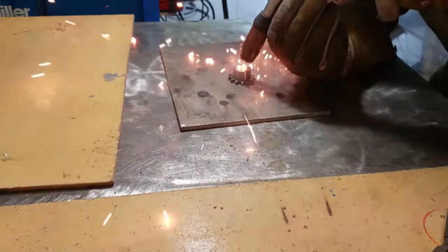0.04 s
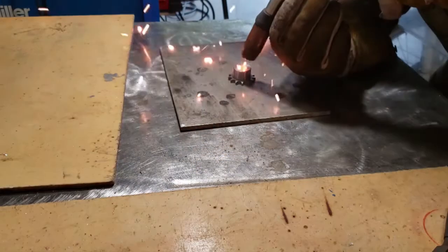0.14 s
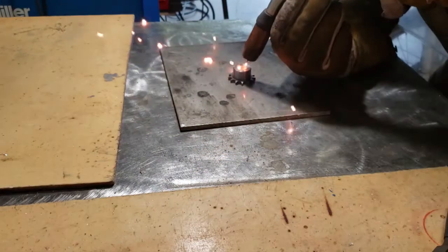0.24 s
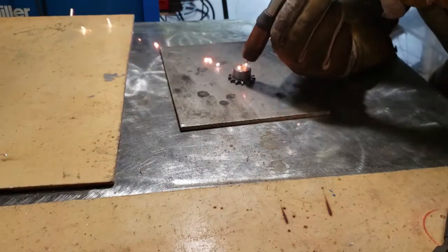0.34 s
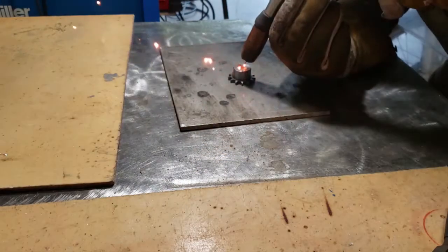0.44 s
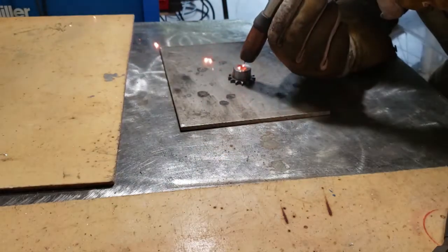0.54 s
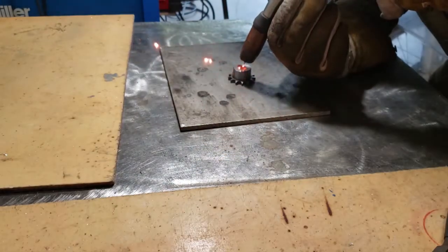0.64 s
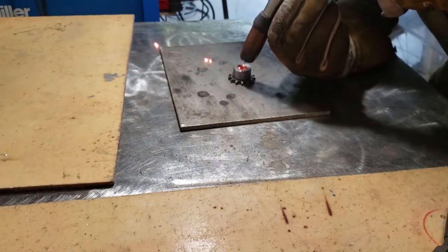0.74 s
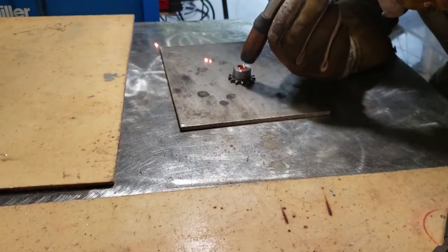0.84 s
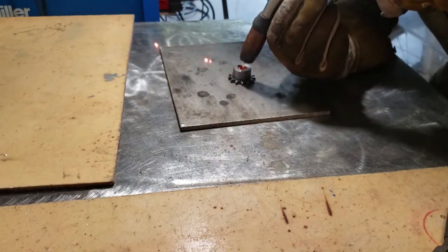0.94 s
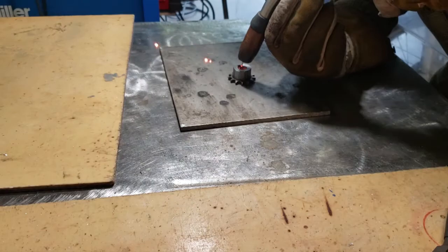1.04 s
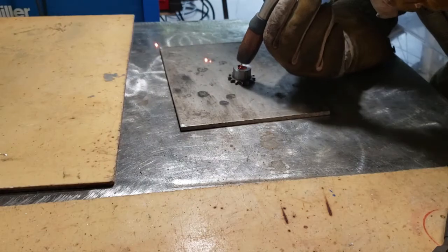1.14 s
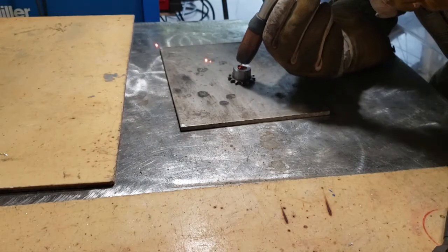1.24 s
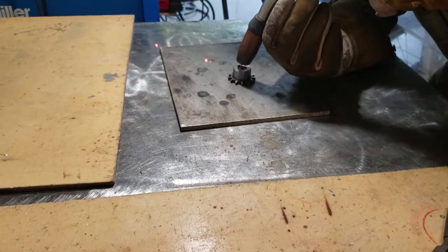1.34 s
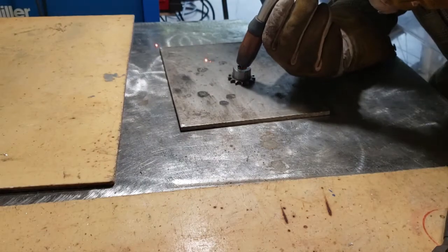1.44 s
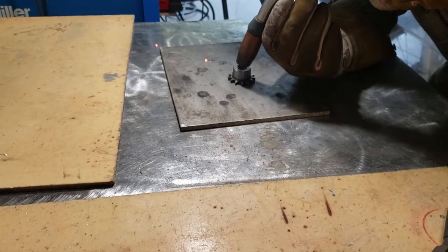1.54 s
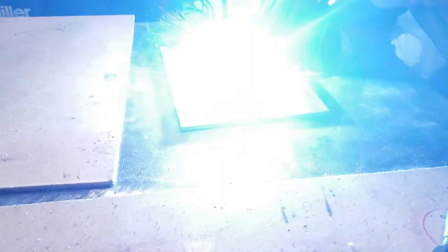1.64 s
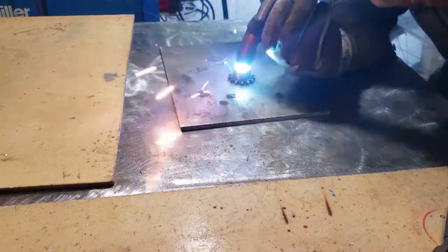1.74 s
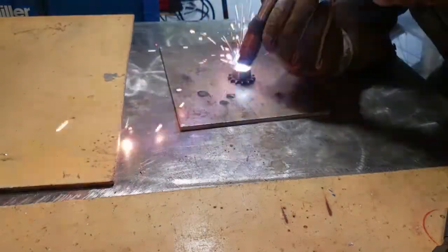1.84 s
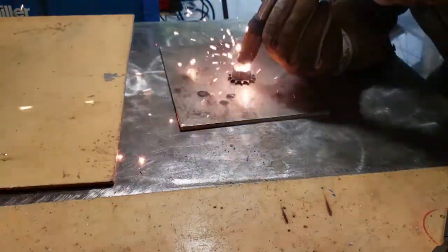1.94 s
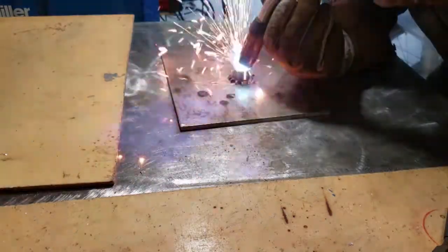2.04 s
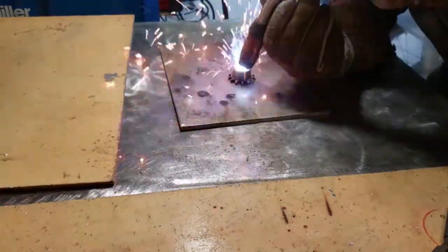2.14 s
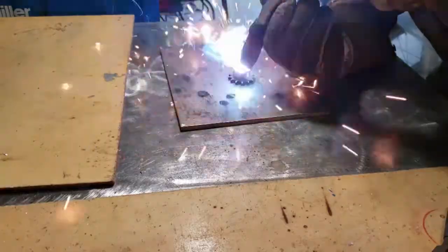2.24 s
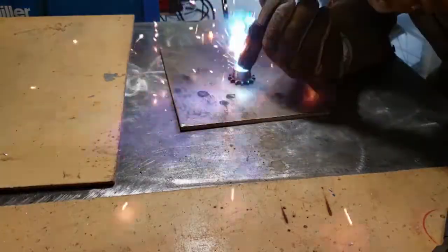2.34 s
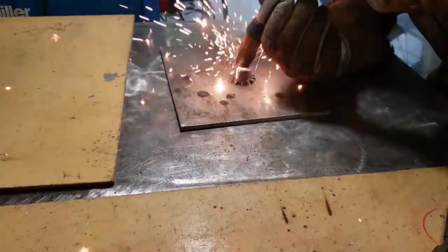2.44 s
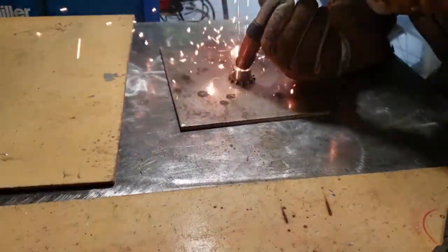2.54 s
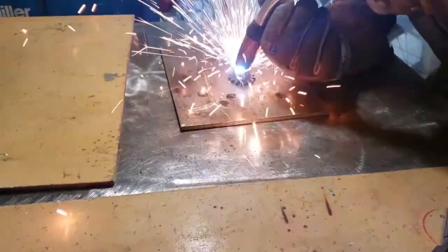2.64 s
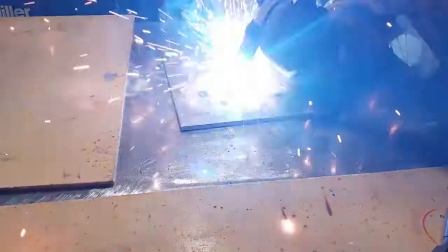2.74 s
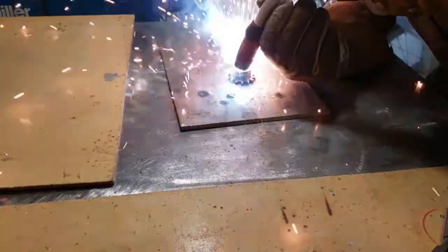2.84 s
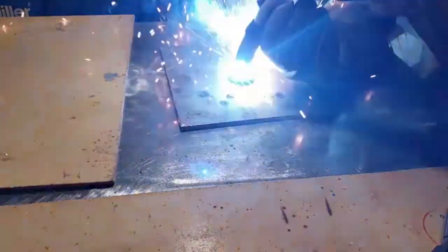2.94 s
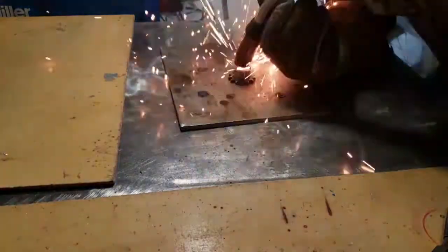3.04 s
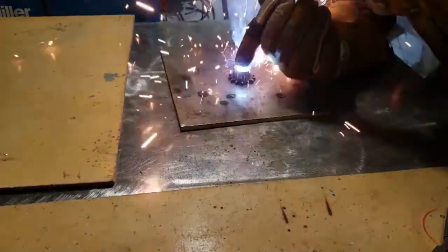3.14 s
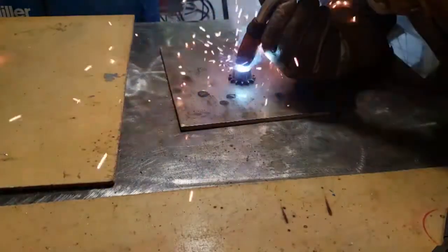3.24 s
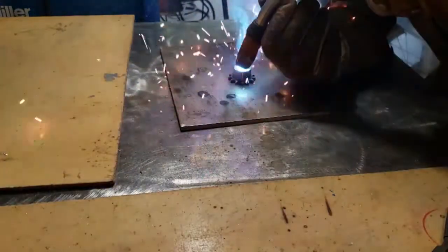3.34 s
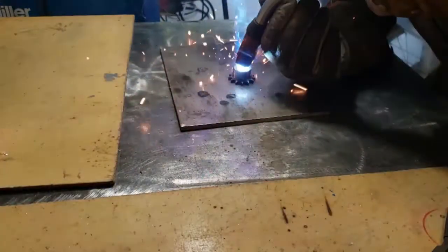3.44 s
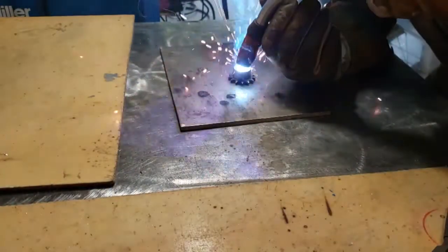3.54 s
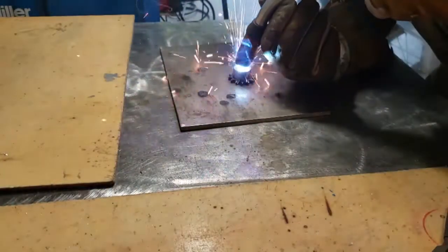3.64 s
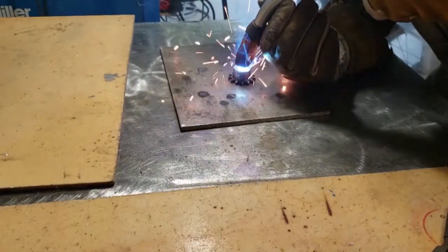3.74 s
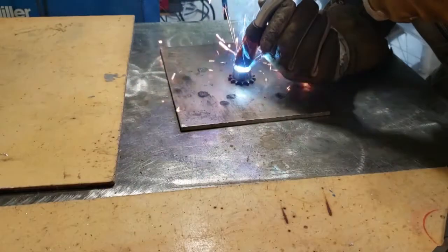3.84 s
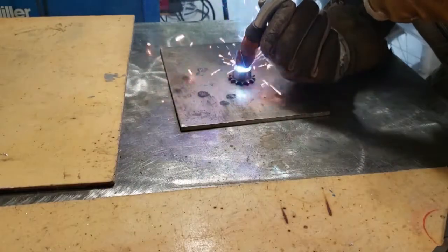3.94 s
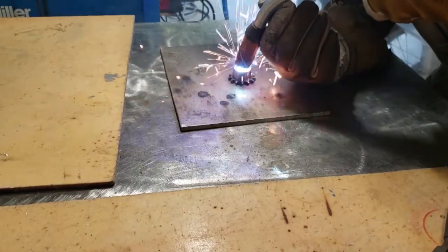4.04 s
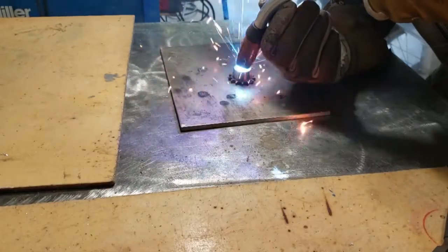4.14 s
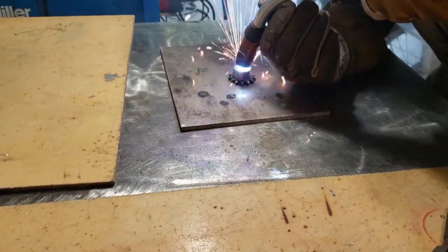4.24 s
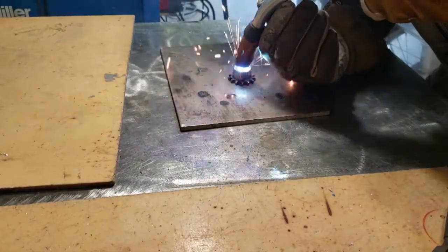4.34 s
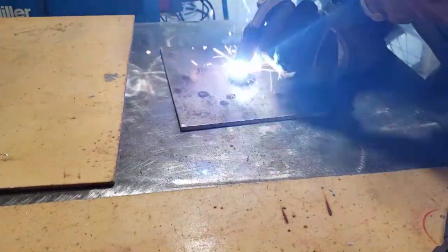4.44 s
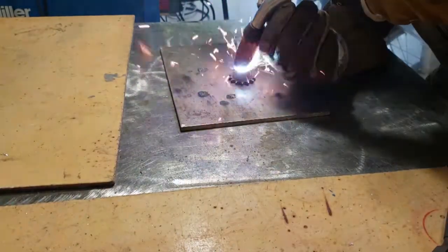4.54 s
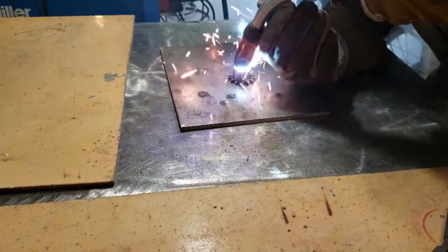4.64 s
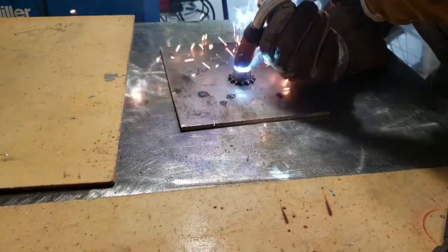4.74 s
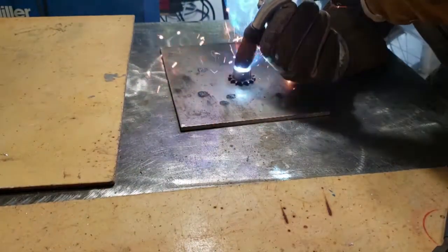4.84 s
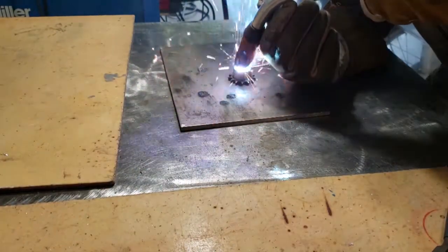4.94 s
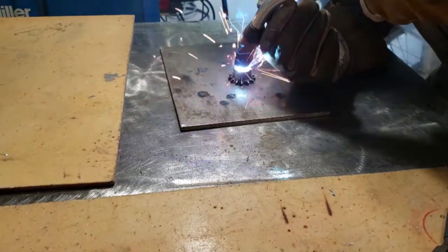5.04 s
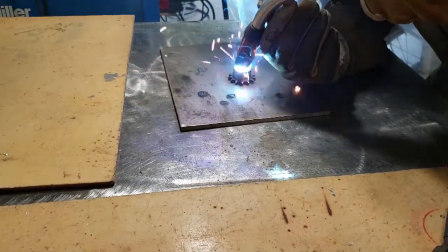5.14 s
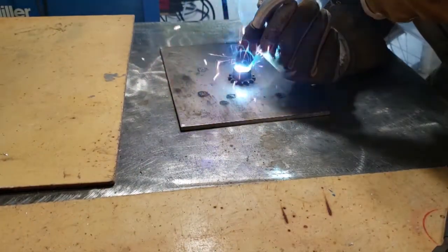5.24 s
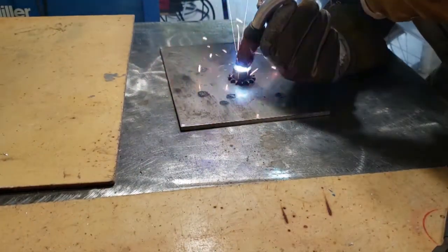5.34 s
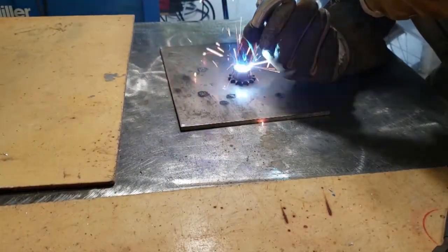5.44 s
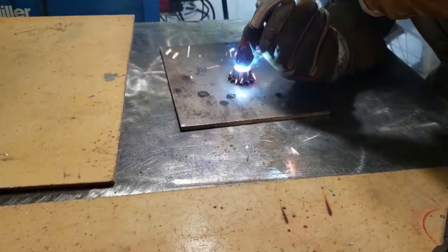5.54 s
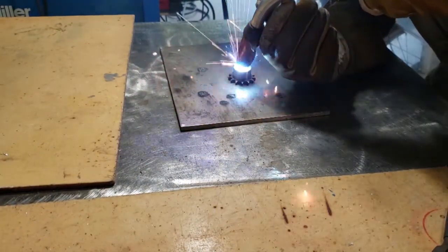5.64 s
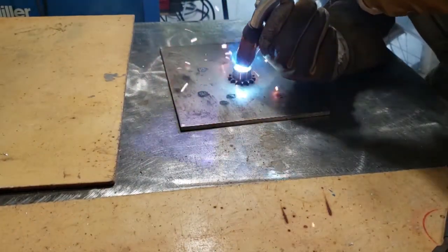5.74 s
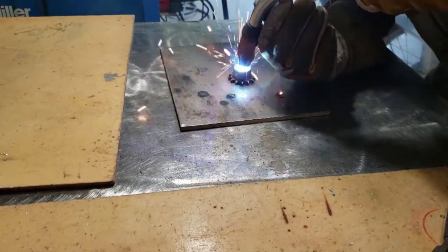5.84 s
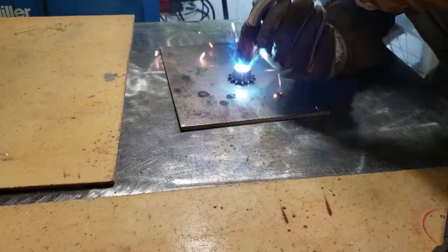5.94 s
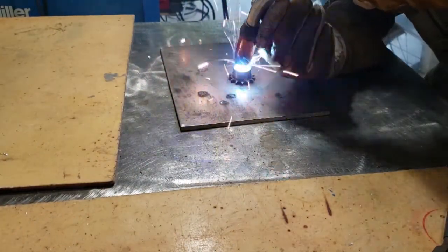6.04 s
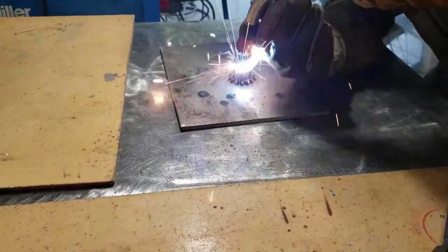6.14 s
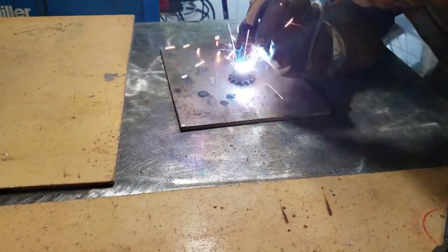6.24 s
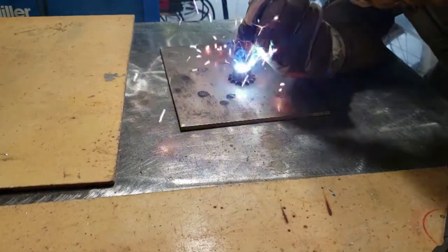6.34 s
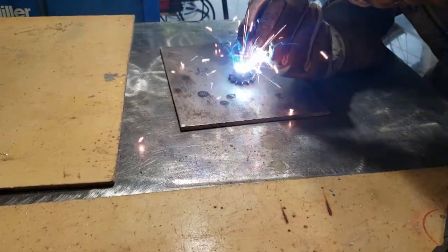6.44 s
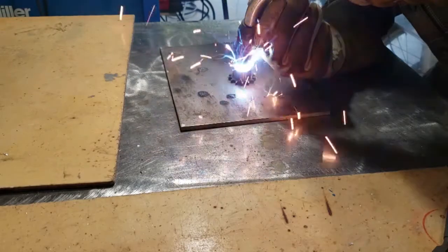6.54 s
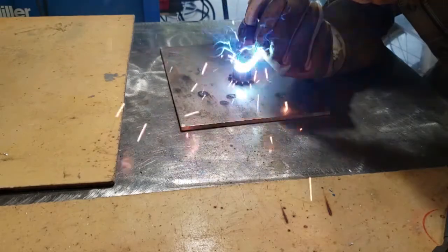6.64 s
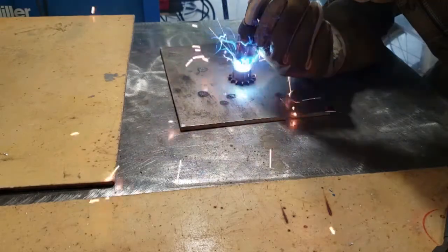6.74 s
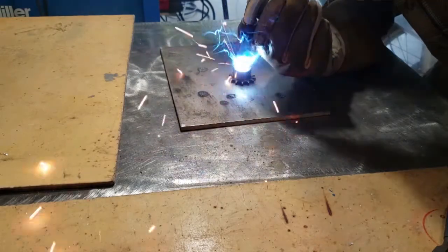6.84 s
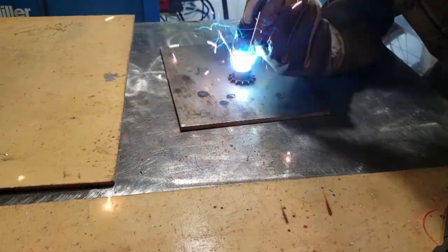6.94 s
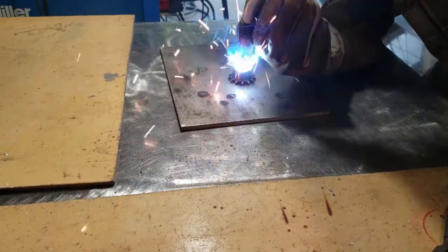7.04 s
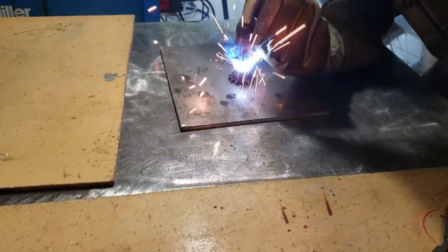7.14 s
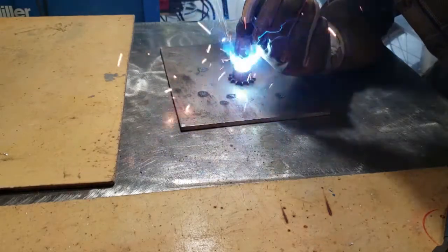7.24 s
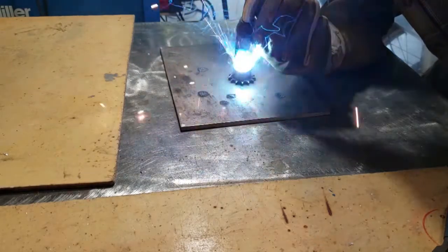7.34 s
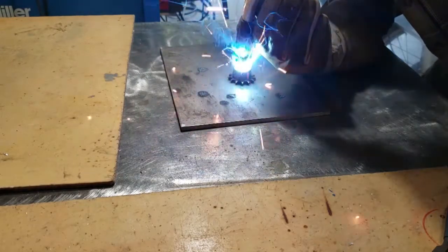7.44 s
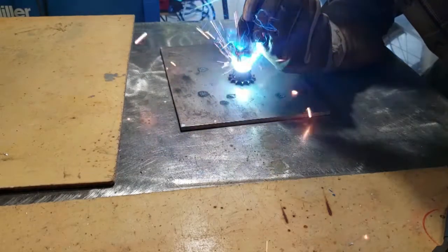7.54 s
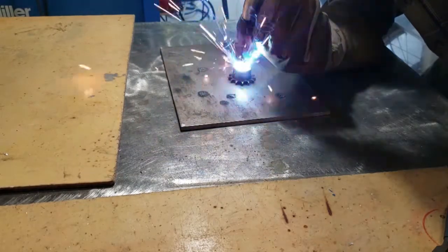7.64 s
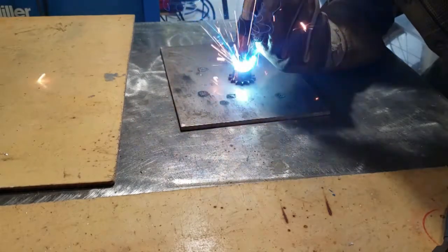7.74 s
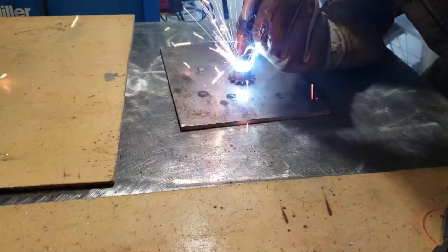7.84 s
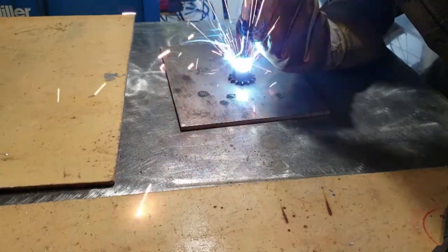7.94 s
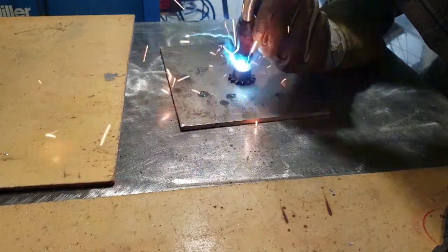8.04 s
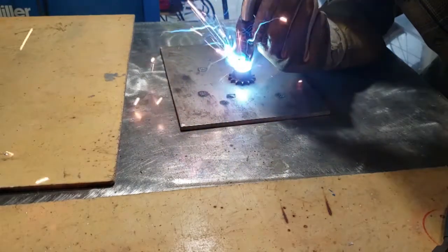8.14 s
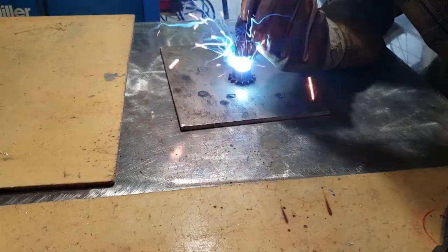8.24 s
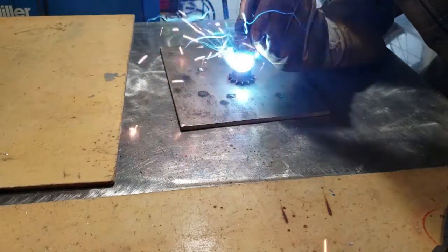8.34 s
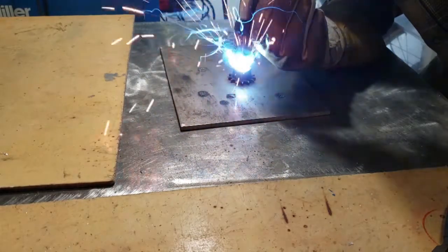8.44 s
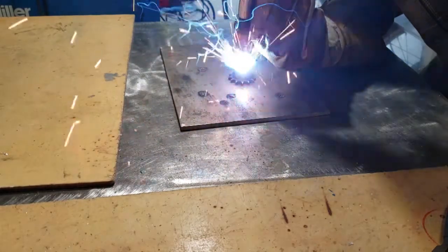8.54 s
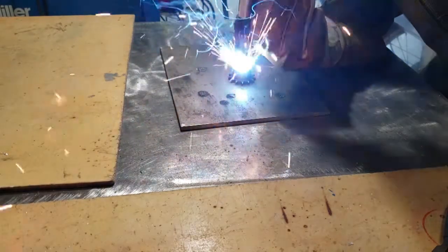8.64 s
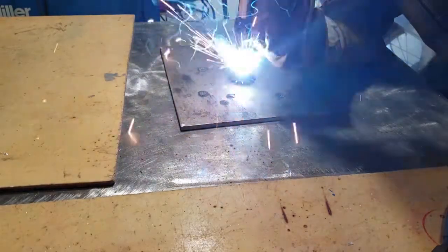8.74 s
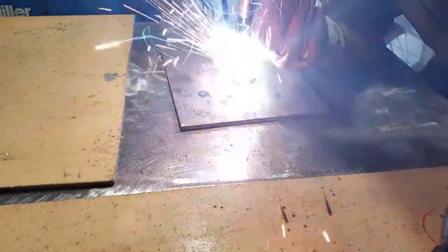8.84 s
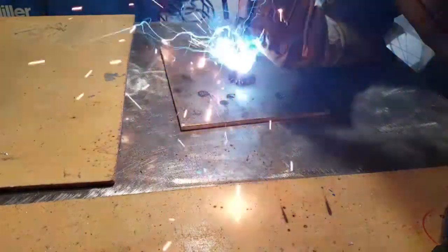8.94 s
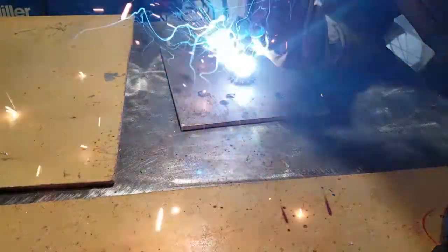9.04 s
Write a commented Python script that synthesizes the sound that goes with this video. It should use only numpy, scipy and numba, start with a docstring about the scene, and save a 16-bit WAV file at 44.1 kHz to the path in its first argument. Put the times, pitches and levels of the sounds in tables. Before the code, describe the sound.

A close stereo phone pickup on a workshop bench, with hard nearby reflections and a short room tail. At 0 seconds a sharp hot-metal spit fades quickly, leaving low transformer hum and soft fan rush, with faint spark ticks at 0.3, 0.4 and 0.8. At 1.5 a snap and spurt of gas leave a thin hiss. From 1.7 to 3.1 the wire stubs and pops: loud irregular cracks, ringing snaps and brief sizzling false starts, with a longer burn around 2.6 and a lull before 2.9. From about 3.1 the arc holds as a dense, uneven frying crackle, swelling around 4.2 and calmer around 5 to 6. Short surges and pops keep punching through. Its narrow hollow ring, around 4.5 kilohertz, climbs towards 6 and broadens after 7, growing hissier and louder by 9. Occasional dull bead thumps hit one side, notably at 7.0 and 8.8.

```python
"""A MIG torch fills the bore of a small steel gear on a workshop bench, close to a phone.
The wire stubs and pops, then the arc settles into a frying crackle: noise snaps drive a ringing bore and hiss.
The bore's resonance climbs overall as it fills, and surges swell the arc. Noise bursts make spits and spatter
ticks, gas hisses, and beads thump a microphone port; sine lines and coloured noise make the welder and its fan."""
import sys
import numpy as np
from scipy import signal
from scipy.fft import rfft, irfft
from scipy.io import wavfile
from scipy.ndimage import uniform_filter1d
from numba import njit

SR = 44100
rng = np.random.default_rng(int(sys.argv[2]) if len(sys.argv) > 2 else 0)


def dump_mix(stems):
    """Bounce the given channels to the path in sys.argv[1] as a 16-bit WAV at rate SR."""
    frames = np.atleast_2d(stems).T  # one column per channel
    limited = np.clip(frames, -1, 1)  # hard clip at full scale
    pcm = np.round(limited * 32767).astype(np.int16)
    wavfile.write(sys.argv[1], SR, pcm)


N = 401751


def undb(db):
    """Decibels to gain."""
    return 10 ** (np.asarray(db) / 20)


def unit(x):
    """Scale to rms 1."""
    return x / np.sqrt(np.mean(x ** 2))


def curve(table):
    """Rows of (time, value), joined by straight lines."""
    return np.interp(np.arange(N) / SR, *np.transpose(table))


def walk(rate):
    """Smooth random drift with rms 1, drawing `rate` new values per second."""
    step = max(int(SR / rate), 1)
    drift = np.repeat(rng.standard_normal(N // step + 1), step)
    drift = uniform_filter1d(uniform_filter1d(drift, step), step)
    return unit(drift[:N])


def impulses(times, sizes):
    """One impulse of each size at each time."""
    return np.bincount((np.maximum(times, 0) * SR).astype(int), sizes, N)[:N]


def fade(x, seconds):
    """Give every impulse an exponential tail."""
    return signal.lfilter([1], [1, -np.exp(-1 / (seconds * SR))], x + 1e-18)


def fizz(snaps, seconds):
    """A short puff of noise after each snap."""
    return fade(snaps, seconds) * rng.standard_normal(N)


def colour(x, spectrum, size=4096):
    """Causal minimum-phase filter with the given spectrum shape; white noise keeps its level."""
    hz, db = np.transpose(spectrum)
    bins = np.maximum(np.arange(size // 2 + 1) * SR / size, 1)
    gain = undb(np.interp(np.log(bins), np.log(hz), db))
    # folding the cepstrum forward in time makes the response causal
    cepstrum = irfft(np.log(gain))
    cepstrum[1:size // 2] *= 2
    cepstrum[size // 2 + 1:] = 0
    response = irfft(np.exp(rfft(cepstrum)))
    return signal.fftconvolve(x, response / np.linalg.norm(response))[:N]


# echoes off the glove and torch, gains before the layer's echo level: delay_ms, left_gain, right_gain
GLOVE_ECHOES = [(1.08, 0.033, 0.082), (2.42, 0.41, 0.59), (4.42, 0.5, 0.045)]
ROOM_T60_S = 0.32
PORT_LAG = 1.4  # samples by which the right port hears the direct sound later


def paths(echo_db, bench_db, room_db, pan_db):
    """Impulse response at two ports: direct sound, near echoes, scatter off the bench and the room's tail."""
    t = np.arange(SR // 2) / SR
    scatter, tail = rng.standard_normal((2, 2, len(t)))
    scatter *= np.exp(-t / 0.013) * (1 - np.exp(-t / 0.00039))
    tail *= undb(-60 * t / ROOM_T60_S) * (1 - np.exp(-t / 0.0017))
    ports = undb(bench_db) * scatter / np.linalg.norm(scatter[0])
    ports = ports + undb(room_db) * tail / np.linalg.norm(tail[0])
    # direct sound: a windowed sinc places the fractional lag
    ports[:, :13] += np.sinc(np.arange(-6, 7) - np.array([[0], [PORT_LAG]])) * np.hanning(13)
    for delay_ms, left, right in GLOVE_ECHOES:
        ports[:, int(delay_ms * SR / 1000)] += undb(echo_db) * np.array([left, right])
    balance = undb(np.array([[pan_db], [-pan_db]]) / 2)
    return ports * balance / np.linalg.norm(ports, axis=1, keepdims=True)


def workshop(x, echo_db, bench_db, room_db, pan_db):
    """The sound hops between two spots on the pool, and each spot scatters differently."""
    first_spot = walk(60) > 0
    out = 0
    for here in (first_spot, ~first_spot):
        response = paths(echo_db, bench_db, room_db, pan_db)
        out = out + signal.fftconvolve((x * here)[None], response, axes=1)[:, :N]
    return out


# hot spits and ticks with no steady arc: start_s, level_db, decay_s
SPIT_EVENTS = [(0.0, -25.5, 0.058), (0.312, -38.5, 0.0032), (0.419, -51, .005), (0.792, -48, .008),
               (0.821, -49, 0.022), (1.502, -22, 0.0032)]
# tone of a spit, relative: freq_hz, level_db
SPIT_TONE = [(300, -3.5), (2500, -5.5), (5000, -7.5), (7200, -2.5), (9300, -6.5), (12000, -3),
             (15500, -1.5)]
# shielding gas after the valve opens: time_s, level_db
GAS_LEVEL = [(1.49, -100), (1.51, -38), (1.66, -43), (1.8, -46)]
# tone of the gas hiss, relative: freq_hz, level_db
GAS_TONE = [(200, -11), (900, -1.5), (2000, -6.5), (4000, -14.5), (9000, -20), (14000, -4.5)]


def spits():
    """Hot metal spits, sparks tick on the bench, and the gas valve opens with a spurt and keeps hissing."""
    envelope = sum(fade(impulses([s], [undb(db)]), decay) for s, db, decay in SPIT_EVENTS)
    spit = colour(envelope * rng.standard_normal(N), SPIT_TONE)
    gas = undb(curve(GAS_LEVEL)) * colour(rng.standard_normal(N), GAS_TONE)
    return workshop(spit + gas, echo_db=-7, bench_db=5.5, room_db=-0.5, pan_db=1.5)


# steady lines of transformer and fan, before the final trims: pitch_hz, level_db
HUM_LINES = [(84, -46), (120, -39), (251, -54), (360, -59.5), (500, -60.5)]
# tone of the fan's rush, relative: freq_hz, level_db
FAN_TONE = [(25, -29), (50, -13), (75, -11), (110, -5.5), (165, -5), (210, -12.5), (300, -16), (500, -22),
            (900, -29), (2000, -37.5), (4000, -45.5), (8000, -56.5), (15000, -52.5)]
# gain ride over the whole welder: time_s, gain_db
WELDER_GAIN = [(1.15, 1.4), (1.3, 4.5), (1.62, 3), (1.9, -0.5), (3.0, -2), (3.4, 0.5), (3.7, -3), (9.1, -2)]


def welder():
    """Transformer and fan lines waver in level and phase over the noise rush of the fan."""
    t = np.arange(N) / SR
    hum = np.zeros(N)
    for hz, db in HUM_LINES:
        level = undb(db + 2 * walk(7)) * np.sqrt(2)
        hum += level * np.sin(2 * np.pi * hz * t + .5 * walk(10))
    mid, side = (colour(rng.standard_normal(N), FAN_TONE) for _ in range(2))
    rush = undb(-40.0) * (mid + undb(-10.0) * side * np.array([[1], [-1]]))
    balance_db = np.array([[.6], [-.6]])
    return undb(curve(WELDER_GAIN) + balance_db) * (undb(-0.5) * hum + rush)


def droplets(rate, scatter_db, count=6000):
    """Uneven snaps as drops of metal leave the wire; the steady feed evens out their power."""
    gaps = rng.gamma(1.4, 1, count)
    chance = np.clip(rng.standard_normal(count), -2, 2)
    gaps = gaps / gaps.mean()
    # a longer wait grows a bigger drop
    snaps = impulses(np.cumsum(gaps) / rate, np.sqrt(gaps) * undb(scatter_db * chance))
    power = uniform_filter1d(snaps ** 2, size=SR // 16)
    return snaps / np.sqrt(np.maximum(power, 1e-6))


def held(start, length, rise_s, fall_s):
    """Exponential attack, hold and release, between 0 and 1."""
    age = np.maximum(np.arange(N) / SR - start, 0)
    return (1 - np.exp(-age / rise_s)) * np.exp(-np.clip((age - length) / fall_s, 0, 20))


# the wire shorts and blows apart, levels before the layer gains: start_s, crack_db, ring_db, sizzle_db
WIRE_POPS = [(1.671, -49, -48, -24), (1.778, -18.5, -12.5, -26), (1.81, -21, -24, -33),
             (1.885, -14.5, -11, -39), (1.964, -23, -15.5, -23), (2.019, -23, -25, -27),
             (2.083, -17.5, -8, -26), (2.173, -28, -18, -18.5), (2.235, -23, -14, -34),
             (2.258, -15, -13, -42), (2.28, -17, -30, -39), (2.384, -13.5, -8.5, -24),
             (2.448, -18, -11.5, -35), (2.559, -21.5, -44, -23), (2.598, -26, -33, -26.5),
             (2.644, -31, -23, -23), (2.925, -24, -22, -39), (3.009, -26.5, -20.5, -36),
             (3.057, -24, -17, -28), (4.021, -22, -17, -23), (4.384, -23, -15, -33),
             (5.234, -27, -20.5, -29), (5.742, -28, -20.5, -28), (6.13, -36, -21, -27),
             (6.363, -27.5, -18, -31), (6.629, -28, -15.5, -29), (7.369, -27.5, -14, -29),
             (7.9, -29, -19, -23)]


def shorts(short_s, dip_db):
    """The arc sinks during the short circuit before each pop."""
    t = np.arange(N) / SR
    gate = np.ones(N)
    for s, *_ in WIRE_POPS:
        gate[(t > s - short_s) & (t < s)] *= undb(dip_db)
    return gate


# arc lights at a pop, burns briefly and dies, before layer gains: start_s, length_s, crack_db, ring_db, sizzle_db
ARC_STARTS = [(1.672, 0.026, -39, -39, -25), (1.781, 0.025, -28.5, -23, -24),
              (1.962, 0.064, -36, -26.5, -24.5), (2.081, 0.035, -35, -27, -33),
              (2.174, 0.053, -40, -38, -28), (2.238, 0.083, -30.5, -26.5, -30),
              (2.384, 0.025, -32.5, -25.5, -36), (2.442, .07, -36.5, -31.5, -44),
              (2.557, 0.31, -33.5, -35, -31.5), (2.919, 0.017, -36, -30.5, -29.5),
              (3.054, .018, -31.5, -34.5, -32)]
# the arc once it holds, between surges, before layer gains: time_s, ring_db, sizzle_db
STEADY_ARC = [(3.1, -39, -52), (3.269, -31.5, -33), (3.58, -29, -26.5), (3.7, -33.5, -35),
              (3.78, -30.5, -29), (4.16, -29.5, -25), (4.31, -28.5, -23.5), (4.37, -37.5, -42),
              (4.56, -33, -32.5), (4.75, -36, -33), (5.15, -39, -34), (6.1, -38.5, -32.5),
              (6.7, -35.5, -30), (7.3, -37.5, -29), (8.3, -35.5, -29.5), (9.05, -32.5, -24.5)]
# crack of the steady arc relative to its ring: time_s, level_db
CRACK_BODY = [(3.1, -5.5), (4.6, -5), (6.5, -9)]
# the wire digs into the pool and the arc swells: start_s, length_s, rise_db
ARC_SURGES = [(4.385, 0.072, 3), (4.467, 0.016, 8.5), (4.778, 0.015, 6), (4.867, 0.1, 6), (5.07, .04, 3),
              (5.224, 0.11, 6.5), (5.554, .11, 8), (5.797, 0.03, 10), (5.946, 0.074, 3.5),
              (6.134, 0.046, 7), (6.196, 0.035, 7), (6.348, 0.035, 10.5), (6.55, 0.024, 1.5),
              (6.62, 0.2, 2), (6.935, 0.024, 7), (7.102, 0.02, 5.5), (7.156, 0.041, 6.5), (7.346, 0.065, 6),
              (7.485, 0.043, 8), (7.55, 0.066, 6.5), (7.707, 0.074, 8), (7.897, 0.078, 5),
              (8.047, 0.093, 3.5), (8.228, 0.14, 5.5), (8.463, 0.14, 4), (8.707, 0.066, 4),
              (8.85, 0.025, 4)]
SURGE_RISE_S, SURGE_FALL_S, DIE_OUT_S = 0.003, 0.0064, 0.025
SIZZLE_SHARE = 0.63  # share of a surge's dB rise that the plasma follows
FLUTTER_DB, FLUTTER_RATE = 1.0, 25  # rms chance swing of the arc, new values per second


def burning():
    """Strength of crack, ring and sizzle: false starts, then a steady arc that surges and flutters."""
    t = np.arange(N) / SR
    times, *levels = np.transpose(STEADY_ARC)
    ring_db, sizzle_db = (np.interp(t, times, db) for db in levels)
    surge_db = sum(db * held(s, length, SURGE_RISE_S, SURGE_FALL_S) for s, length, db in ARC_SURGES)
    crack_db = ring_db + curve(CRACK_BODY) + surge_db
    steady = undb([crack_db, ring_db + surge_db, sizzle_db + SIZZLE_SHARE * surge_db])
    steady = (t > times[0]) * steady
    starts = sum(undb(db)[:, None] * held(s, length, SURGE_RISE_S, DIE_OUT_S)
                 for s, length, *db in ARC_STARTS)
    flutter = undb(FLUTTER_DB * walk(FLUTTER_RATE))
    return (starts + steady) * flutter * shorts(short_s=0.017, dip_db=-8)


@njit
def resonate(x, hz, width):
    """State-variable band-pass with a moving centre and width in Hz, gain 1 at the centre."""
    y, band, low = np.empty(len(x)), 0., 0.
    for i in range(len(x)):
        g, damping = np.tan(np.pi * hz[i] / SR), width[i] / hz[i]
        v = (band + g * (x[i] - low)) / (1 + g * (g + damping))
        band = 2 * v - band
        low = low + 2 * g * v
        y[i] = damping * v
    return y


# resonance of the bore, climbing overall as it fills, before heat and slosh: time_s, pitch_hz
BORE_PITCH = [(1.8, 3660), (2.0, 3790), (2.7, 4650), (3.2, 4370), (4.3, 4530), (5.6, 4690), (6.8, 4940),
              (7.4, 5450), (9.1, 5900)]
# width of that resonance, least under a calm arc, greatest when nearly full: time_s, width_hz
BORE_SPREAD = [(1.7, 1100), (2.7, 1390), (3.3, 745), (6.8, 800), (7.4, 2050), (9.1, 2010)]
# tone of the open crack, relative: freq_hz, level_db
CRACK_TONE = [(100, -28.5), (300, -2.5), (600, -5.5), (850, 2), (1300, 0.5), (1900, 3), (2400, 0),
              (3500, 0), (5000, -3), (7000, -2.5), (9200, -22.5), (11500, 1), (15500, 9)]
# tone of the sizzle while the arc flares in the open, relative: freq_hz, level_db
FLARE_TONE = [(500, -28), (3300, -10), (5500, 2.5), (7500, -3), (9200, -3.5), (10500, 2.5), (11500, 10.5),
              (12700, 10.5), (13700, 4), (14700, 11), (15600, 0.5)]
# tone of the sizzle once the arc settles into the bore, relative: freq_hz, level_db
SIZZLE_TONE = [(500, -28.5), (3300, -10.5), (5500, 2.5), (7500, 1), (9200, -4.5), (10200, 2), (11000, 9),
               (12500, 8.5), (13700, -10.5), (14700, 14.5), (15600, -3.5)]
HEAT_RISE_HZ, COOL_S = 2430, 0.025  # a pop of ring level 1 heats the gas and briefly lifts the resonance


def arc():
    """Droplet snaps and pops crack in the open, ring the bore and set the plasma sizzling."""
    cracking, ringing, plasma = burning()
    snaps = droplets(rate=255, scatter_db=4.6)  # drops per second
    frying = unit(fizz(snaps, 0.00048) + undb(-13) * fizz(snaps, 0.016))
    times, *levels = np.transpose(WIRE_POPS)
    pop_crack, pop_ring, pop_sizzle = (impulses(times, undb(db)) for db in levels)

    crack = cracking * (undb(11.5) * snaps + undb(5.5) * frying)
    # a whole stub of wire blowing apart pushes for longer than a droplet, so it cracks fuller
    crack = crack + undb(25) * fade(pop_crack, .00003)

    sparks = unit(snaps + undb(-2) * frying)
    sizzle = undb(1.5) * plasma * sparks
    sizzle = sizzle + undb(5.5) * fizz(pop_sizzle, 0.014) + undb(12.5) * fizz(pop_sizzle, 0.00053)
    settled = np.arange(N) / SR > STEADY_ARC[0][0]
    sizzle = colour(sizzle * ~settled, FLARE_TONE) + colour(sizzle * settled, SIZZLE_TONE)

    ring = ringing * (undb(-1.5) * snaps + frying)
    ring = ring + undb(16) * pop_ring + undb(-4) * fizz(pop_ring, 0.006)
    bore_hz = curve(BORE_PITCH) + HEAT_RISE_HZ * fade(pop_ring, COOL_S)
    bore_hz = bore_hz * (1 + 0.014 * walk(40))  # the molten pool sloshes
    width_hz = curve(BORE_SPREAD)
    ring = resonate(ring, bore_hz, width_hz) * np.sqrt(SR / width_hz)  # a wider peak is lower
    ring = undb(-3) * resonate(ring, bore_hz, np.full(N, 4200.))  # little gets out far from the resonance

    # the bore beams upward, so its ring arrives mostly by reflection
    return (workshop(colour(crack, CRACK_TONE), echo_db=-18, bench_db=-7, room_db=-9, pan_db=.6)
            + workshop(ring, echo_db=-1, bench_db=12.5, room_db=6, pan_db=3.0)
            + workshop(sizzle, echo_db=-10, bench_db=-3, room_db=-4, pan_db=.4))


# spatter strikes a microphone port, signed pushes before the thump gain: start_s, left_push, right_push
BEAD_HITS = [(1.6728, 0.025, 0.34), (2.928, 0.071, 0.0063), (5.2257, 0.12, -0.005), (6.004, 0.15, 0.0056),
             (6.288, 0.092, -0.02), (6.98, 0.45, 0.011), (7.471, 0.12, -0.0062), (7.9088, 0.019, -0.28),
             (8.685, 0.19, 0.018), (8.8406, 0.53, -0.022)]


def port_hits(hz=53, damping=0.55, sizzle_db=-17):
    """A hot bead gives a port a pressure step; the microphone's bass cut turns it into a thump."""
    times, *pushes = np.transpose(BEAD_HITS)
    omega = 2 * np.pi * hz
    bass_cut = signal.bilinear([1, 0, 0], [1, damping * omega, omega ** 2], SR)
    out = []
    for push in pushes:
        hits = impulses(times, push)
        thump = signal.lfilter(*bass_cut, fade(hits, 0.0054))
        sizzle = colour(fizz(hits, 0.025), SPIT_TONE)
        out.append(undb(3.5) * thump + undb(sizzle_db) * sizzle)
    return np.array(out)


def scene():
    """Everything on and around the bench."""
    return spits() + welder() + arc() + port_hits()


TOP_HZ = 15800


def record(dry):
    """The phone rounds the loudest peaks and cuts the top."""
    rounded = 1.3 * np.tanh(dry / 1.3)
    top_cut = signal.ellip(10, .2, 70, TOP_HZ, fs=SR, output="sos")
    return signal.sosfilt(top_cut, rounded)


dry = scene()
out = record(dry)
dump_mix(out)
```